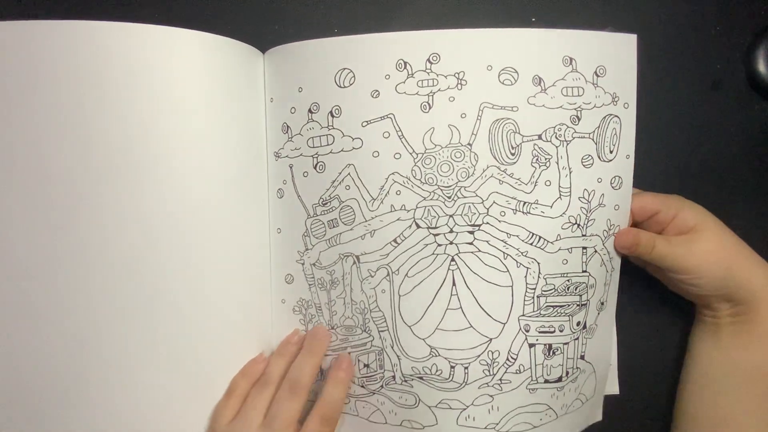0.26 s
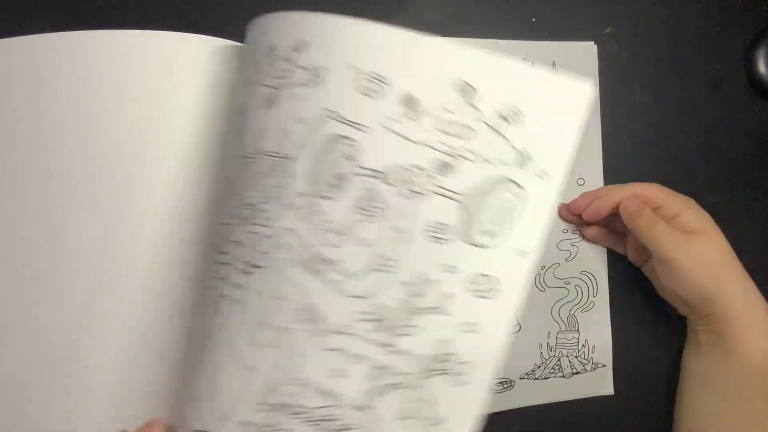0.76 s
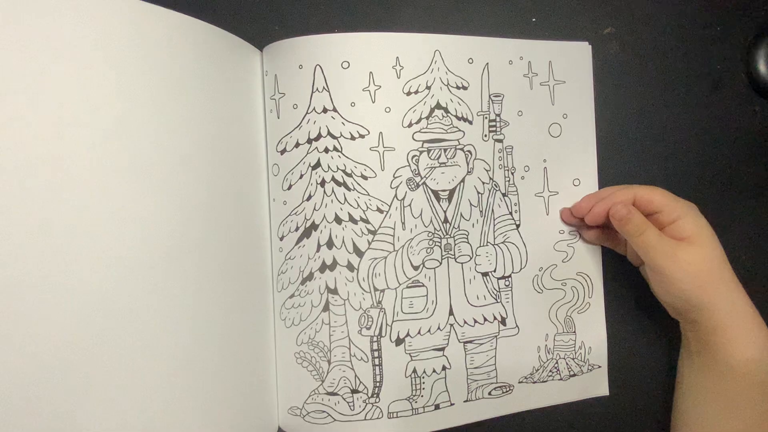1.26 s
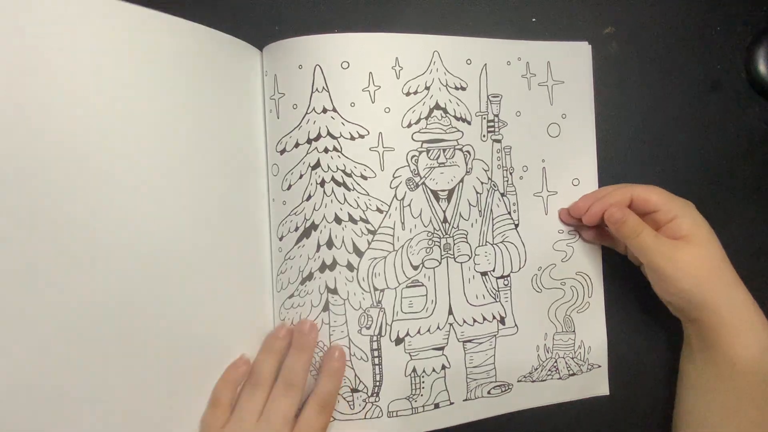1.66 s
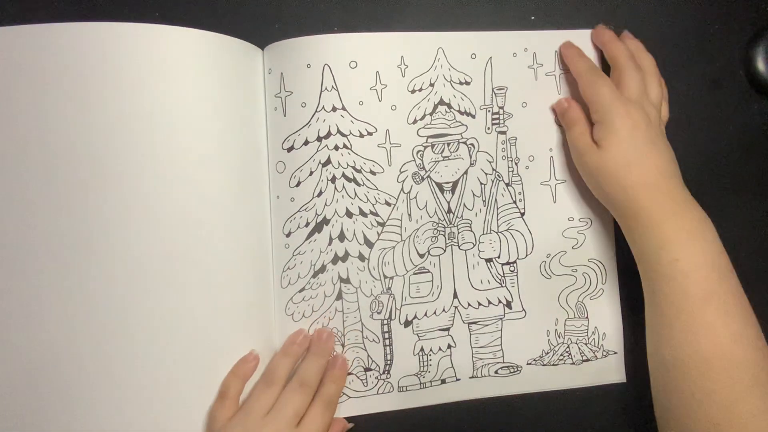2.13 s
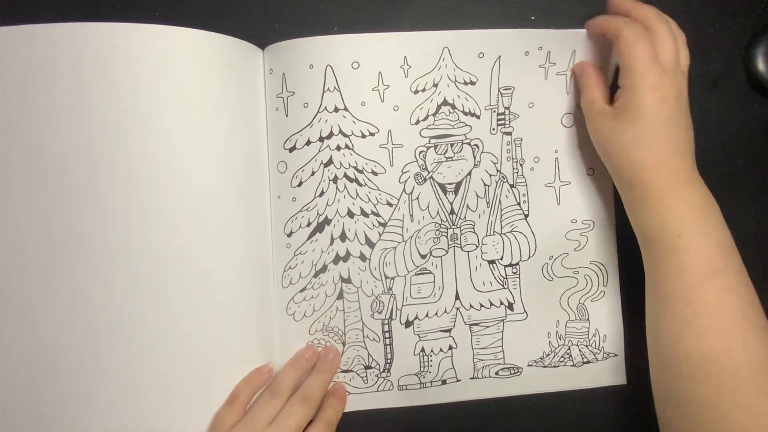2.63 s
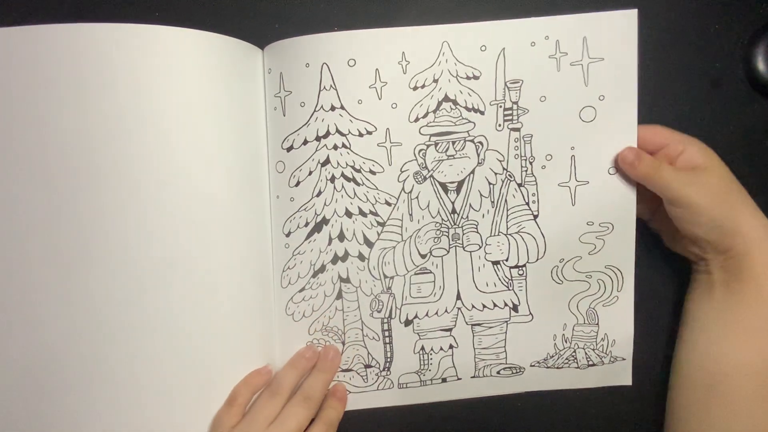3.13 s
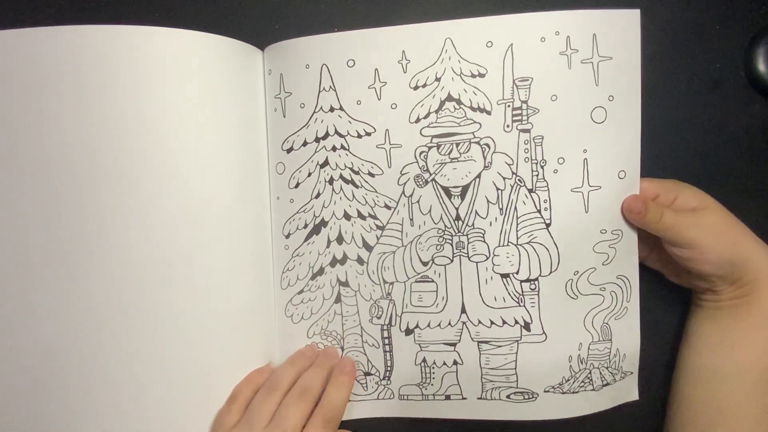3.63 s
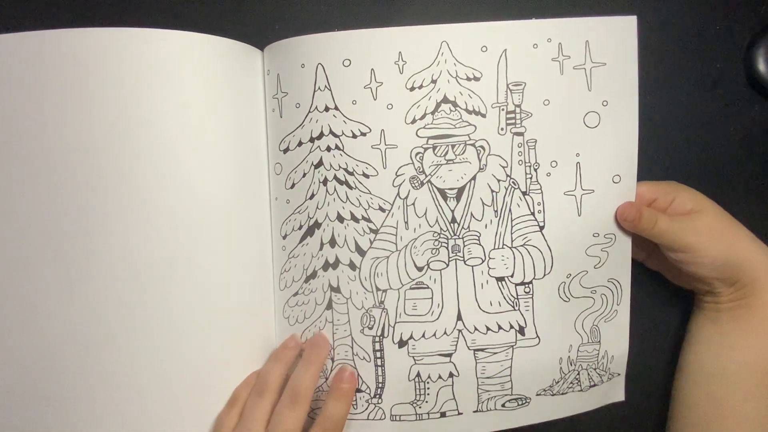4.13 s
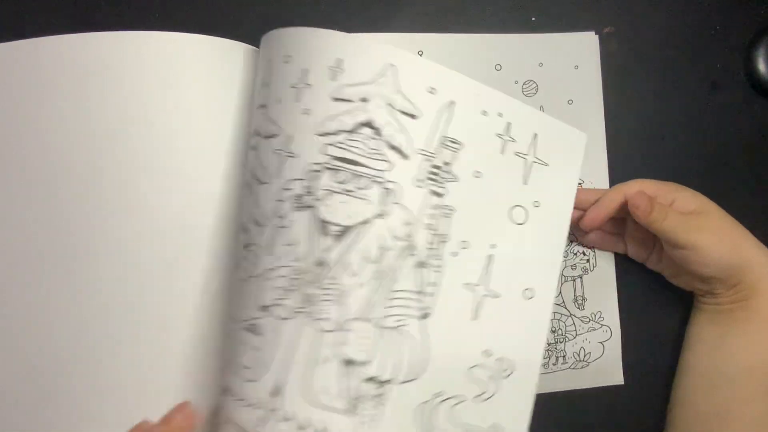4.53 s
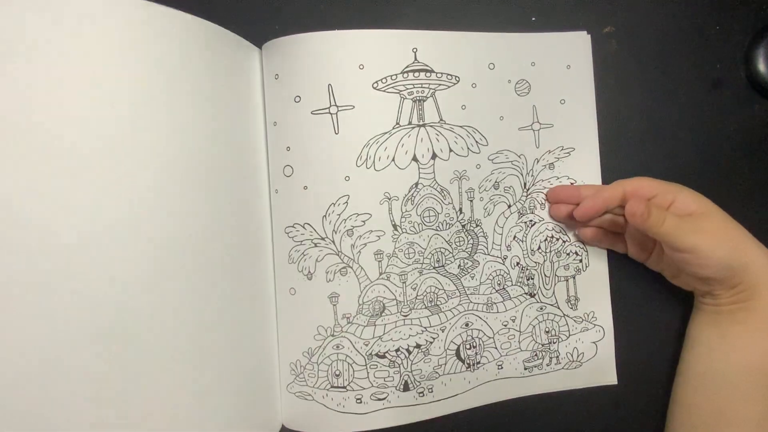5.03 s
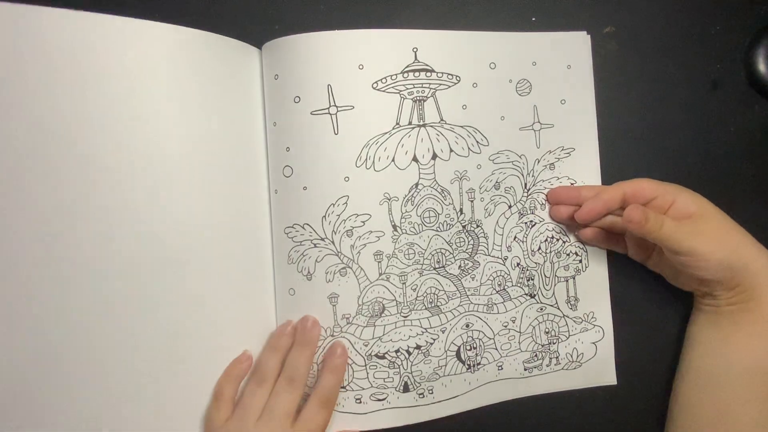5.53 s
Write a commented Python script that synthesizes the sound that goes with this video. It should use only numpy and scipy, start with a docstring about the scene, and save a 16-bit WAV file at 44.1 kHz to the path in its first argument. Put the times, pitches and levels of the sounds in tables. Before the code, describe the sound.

A steady low fan hum lies under close paper handling. First small crisp ticks as a page is lifted, then a broad dry swish and a buckling flop with a puff of air. Skin brushes and rubs the paper, with sharper scuffs midway and a quieter lull. Another page turns with a swish, lands with fuller hollow pops, and is lightly smoothed. Short, soft indoor reverberation.

```python
"""A fan drones throughout in a small, quiet room: coloured noise. A sheet of a large paper book is lifted with
small ticks, then swishes over its neighbour: dense random clicks, with an echo between sheet and book.
It buckles and flops down on a cushion of air: runs of pops ring the sheet over thuds and low puffs.
Hands smooth the page and feel along the edge for the next corner: duller, skin-coloured clicks.
Then a second page is ticked, swished and flopped over, and the last rubs and ticks follow."""
import sys
import numpy as np
from scipy import signal
from scipy.fft import rfft, irfft
from scipy.io import wavfile
from scipy.ndimage import uniform_filter1d

SR = 44100
rng = np.random.default_rng(int(sys.argv[2]) if len(sys.argv) > 2 else 0)


def put_to_file(sound):
    """Save the sound as 16-bit audio at rate SR, in the file named by the first command-line argument."""
    columns = np.atleast_2d(sound).T  # one column per channel
    safe = np.clip(columns, -1, 1)
    whole_steps = np.round(safe * 32767)
    wavfile.write(sys.argv[1], SR, whole_steps.astype(np.int16))


N = 255339
TIME = np.arange(N) / SR
HZ = np.maximum(np.fft.rfftfreq(N, 1 / SR), 1)


def from_db(db):
    """Decibels to gain."""
    return 10 ** (np.asarray(db) / 20)


def rms_one(x):
    """Scale to unit power."""
    return x / np.sqrt(np.mean(x ** 2) + 1e-20)


def over_hz(points):
    """Read a table of (frequency [Hz], value) at every frequency, on a logarithmic axis."""
    hz, value = np.transpose(points)
    return np.interp(np.log(HZ), np.log(hz), value)


def band(x, edge_hz, kind, order=2):
    """Causal Butterworth filter."""
    return signal.sosfilt(signal.butter(order, edge_hz, kind, fs=SR, output="sos"), x + 1e-18)


def resonate(x, hz, width_hz):
    """One two-pole resonance with a gain of about 1 on top."""
    r = np.exp(-np.pi * width_hz / SR)
    feed = np.array([1, 0, -1]) * (1 - r * r) / 2
    feedback = [1, -2 * r * np.cos(2 * np.pi * hz / SR), r * r]
    return signal.lfilter(feed, feedback, x + 1e-18)


def drift(rate):
    """Slow random wander around 0: straight lines between `rate` random points per second."""
    knots = rng.standard_normal(4000)
    return np.interp(TIME * rate, np.arange(len(knots)), knots)


def delayed(x, lag_s):
    """Read one channel a little later; the lag may vary over time."""
    return np.interp(TIME - lag_s, TIME, x)


def evened(x, span_s):
    """Steady the power of a noise over a short span."""
    power = uniform_filter1d(np.mean(x ** 2, axis=0), max(int(span_s * SR), 2))
    return x / np.sqrt(power.clip(0) + 1e-9)


# Stereo likeness of the sides: (frequency [Hz], left-right correlation [-1 to 1])
STEREO_LIKENESS = [(60, .99), (150, .93), (300, .72), (700, .35), (2000, .35), (4500, .45), (8000, .75),
                   (15000, .82)]
# Stereo balance: (frequency [Hz], left over right [dB])
STEREO_BALANCE = [(60, -1), (300, -4), (700, 4.5), (1300, 3.5), (2400, 1.5), (4200, 0), (6000, -8),
                  (9000, -0.5), (15000, 0.5)]
# Phase between the two microphone ports: (frequency [Hz], left ahead of right [rad])
PORT_PHASE = [(400, 0), (800, 0.8), (1500, -0.04), (3100, -5), (4200, -6.5), (6200, -7.5), (8300, -6.5),
              (16000, -6.7)]


def spread(pair, colour_db):
    """Mix two unrelated signals into one coloured stereo sound of unit power."""
    mid, side = rfft(pair)
    alike = over_hz(STEREO_LIKENESS)
    signs = np.array([[1], [-1]])
    stereo = np.sqrt(1 + alike) * mid + np.sqrt(1 - alike) * side * signs
    stereo[0] *= np.exp(1j * over_hz(PORT_PHASE))
    gain_db = colour_db + signs * over_hz(STEREO_BALANCE) / 2
    return rms_one(irfft(stereo * from_db(gain_db), N))


# Narrow rings and hollows in the rustle: (frequency [Hz], width [Hz], boost or cut [dB])
RUSTLE_RINGS = [(2830, 1600, -1.5), (3440, 130, 0.5), (3825, 190, 2.5), (4240, 540, 3), (5170, 180, 2),
                (6030, 200, 2.5), (5940, 150, -3.5), (7220, 160, -2), (7540, 150, -1.5), (9300, 120, 5),
                (10100, 80, 0.5), (10080, 140, 5)]


def rustle_colour(points):
    """A broad colour with the narrow rings and hollows on top, in dB."""
    rings = sum(db / (1 + (2 * (HZ - hz) / width) ** 2) for hz, width, db in RUSTLE_RINGS)
    return over_hz(points) + rings


def grains(per_s, size_db):
    """Fibres catch and slip: two streams of random clicks of uneven size, at unit power."""
    sizes = from_db(size_db * np.minimum(rng.exponential(1, (2, N)), 5))
    slips = rng.random((2, N)) < per_s / SR
    return rms_one(sizes * rng.choice([-1, 1], (2, N)) * slips)


def registers(texture, scrape_top_hz):
    """Split a rustle into hiss, top treble, scrape and hollow rumple, each of unit power."""
    edges_hz = [(2640, 7390), (7620, .45 * SR), (1010, scrape_top_hz), (418, 810)]
    return [rms_one(band(texture, edge, "band", order=4)) for edge in edges_hz]


def shifting(texture, depth, count=14):
    """As the contact travels over the paper, resonances come and go."""
    for_hz = np.geomspace(1400, 13000, count)
    return texture + sum(depth * drift(11) * resonate(texture, hz, hz / 9) for hz in for_hz)


STROKE_DEPTH_DB, STROKE_CURVE = 21.5, 1.23   # level lost over one attack or release; roundness of the fade
TOP_FOLLOWS = 1.4   # the top treble swings this much more than the hiss


def friction(strokes, parts, trims_db):
    """Each stroke speeds up, holds and slows; the top treble sags more in dB than the other registers."""
    power = np.zeros((len(parts), N))
    for s, attack, hold, release, level, top, scrape in strokes:
        near = slice(max(int((s - 3 * attack) * SR), 0), int((s + hold + 3 * release) * SR))
        age = TIME[near] - s
        slowing = np.maximum(np.maximum(-age / attack, (age - hold) / release), 0)
        sag = STROKE_DEPTH_DB * slowing ** STROKE_CURVE
        hiss = level - sag
        treble = level + top - TOP_FOLLOWS * sag
        # scrape and rumple share one level
        power[:, near] += from_db([hiss, treble, hiss + scrape, hiss + scrape]) ** 2
    return sum(part * np.sqrt(p) * from_db(trim) for part, p, trim in zip(parts, power, trims_db))


def blows(times, levels_db, rise_s, fade_s):
    """Envelope of blows that swell to a peak and die away exponentially; their powers add."""
    power = np.zeros(N)
    # a floor of 0.1 ms is added to every rise and fade
    events = np.broadcast_arrays(times, levels_db, np.abs(rise_s) + 1e-4, np.abs(fade_s) + 1e-4)
    for s, db, rise, fade in zip(*events):
        near = slice(max(int((s - 7 * rise) * SR), 0), int((s + 7 * fade) * SR))
        age = TIME[near] - s
        power[near] += (from_db(db) * np.exp(np.minimum(age / rise, -age / fade))) ** 2
    return np.sqrt(power)


# Resonances of the sheet lying on the book: (frequency [Hz], width [Hz], level [dB])
SHEET_MODES = [(318, 69, -5), (480, 112, -2.5), (615, 78, 2), (744, 96, -0.5), (957, 38, 4.5),
               (1185, 360, -10), (1390, 120, -2), (1865, 800, -17.5)]


def knocks(times, levels_db, damping=2.4):
    """One sharp contact each rings the sheet, which the finger damps at once by widening its modes."""
    click = signal.unit_impulse(SR // 20)
    ring = sum(from_db(db) * resonate(click, hz, damping * wide) for hz, wide, db in SHEET_MODES)
    ring = band(ring, [400, 1800], "band", order=4)
    contacts = np.zeros(N)
    contacts[(times * SR).astype(int)] = from_db(levels_db)
    return signal.fftconvolve(contacts, ring / np.abs(ring).max())[:N]


# Colour of the fan: (frequency [Hz], relative density [dB per Hz])
FAN_COLOUR = [(15, -20), (25, -24.5), (76, 3.5), (166, -8.5), (293, -14.5), (363, -17), (463, -23),
              (531, -16.5), (818, -12), (1040, -11), (1940, -20.5), (2480, -33.5), (5000, -50.5),
              (14800, -53.5), (16000, -64)]


def fan(level_db=-55.5):
    """A low drone with a soft rush of air above it: steady coloured noise."""
    return from_db(level_db) * spread(rng.standard_normal((2, N)), over_hz(FAN_COLOUR))


ROOM_T60_S = 0.38   # time to decay by 60 dB


def room(x, boom_hz=280, wall_hz=1000, treble_db=-11):
    """A diffuse tail: the boom is alike on both sides, and the furnishings soak up the treble."""
    age = TIME[:SR // 2]
    tail = rng.standard_normal((3, len(age))) * from_db(-60 * age / ROOM_T60_S) * (age > .006)
    tail /= np.sqrt(np.sum(tail ** 2, axis=1, keepdims=True))
    sides = tail[:2]
    boom = band(tail[2], boom_hz, "low")
    walls = 0.27 * band(sides, [boom_hz, wall_hz], "band", order=1)
    return signal.fftconvolve(x, boom + walls + from_db(treble_db) * sides, axes=1)[:, :N]


def nearby_echoes(x, count=5):
    """Hard things around the desk throw the treble back within a few milliseconds."""
    treble = band(x, 3100, "high")
    lags = (rng.uniform(.0015, .007, count) * SR).astype(int)
    return .1 * sum(np.pad(treble, ((0, 0), (lag, 0)))[:, :N] for lag in lags)


# Air squeezed from under a falling or pressed page:
# (time of peak [s], peak level [dB], pitch [Hz], time from peak to 1/e [s])
AIR_PUFFS = [(1.122, -47, 81.4, 0.017), (1.17, -29, 81.5, 0.0081), (1.649, -39, 69.6, 0.028),
             (4.992, -45, 78.5, 0.039)]


def air_cushion():
    """Escaping air makes soft, low puffs that swell and sink: tones under a bell-shaped envelope."""
    puffs = np.zeros(N)
    for s, db, hz, length in AIR_PUFFS:
        age = TIME - s
        puffs += from_db(db) * np.cos(2 * np.pi * hz * age) * np.exp(-(age / length) ** 2)
    return puffs


# Colour of skin on paper, also heard in the ticks: (frequency [Hz], relative density [dB per Hz])
SKIN_COLOUR = [(240, -28), (400, -5.5), (496, -30), (536, -16), (588, -18), (765, 0), (1310, -7),
               (1420, -6.5), (2400, -5.5), (3420, -4.5), (5350, -6.5), (6050, -4.5), (7170, -16),
               (9920, -19), (16000, -27)]
# A hand smooths the page or feels along its edge; levels are before the register trims:
# (time at full speed [s], attack [s], hold [s], release [s],
#  hiss level [dB], top treble re hiss [dB], scrape re hiss [dB])
HAND_RUBS = [(1.537, 0.012, .03, .06, -59, 4, 2), (1.59, 0.048, 0.017, 0.075, -55, 4, 3),
             (1.66, 0.029, 0.009, 0.071, -55.5, 1, 0), (1.78, 0.14, 0.015, 0.14, -60, 0.5, -3),
             (1.9, 0.15, .37, 0.15, -68.5, 5.5, -7), (1.985, 0.074, 0.019, 0.12, -64, 7.5, 2),
             (2.39, 0.3, 0.21, 0.081, -70, -6.5, 0.5), (2.67, 0.068, 0.011, 0.045, -53, -6.5, -16),
             (2.773, 0.025, 0.016, 0.06, -48.5, -9, -7), (2.86, 0.11, 0.06, 0.041, -46.5, -0.5, -15.5),
             (2.96, .05, 0.18, 0.053, -62, -0.5, -5), (3.22, 0.091, 0.16, 0.23, -60.5, 0, -6),
             (3.33, 0.057, 0.012, 0.032, -59, -4, 2), (3.56, 0.17, 0.17, .05, -74.5, -19, -2.5),
             (3.75, 0.053, 0.054, .15, -58.5, -1.5, -9.5), (5.15, 0.05, 0.11, .05, -83, -21, 0),
             (5.315, 0.023, 0.053, 0.091, -61, 2.5, -2.5), (5.44, 0.046, 0.05, 0.086, -61.5, -4, -1.5),
             (5.69, 0.17, 0.11, .1, -60, 1, -12.5)]


def rubbing_hands(judder_db=1.22, scrape_top_hz=2400):
    """Skin drags unevenly over the paper: dense slips whose level judders."""
    texture = spread(grains(per_s=11000, size_db=2.0), rustle_colour(SKIN_COLOUR))
    texture = shifting(texture, depth=.42)
    parts = registers(texture * from_db(judder_db * drift(110)), scrape_top_hz)
    return friction(HAND_RUBS, parts, trims_db=[1.0, -0.5, 4.0, -3.0])   # hiss, top, scrape, rumple


# Crisp ticks of page edges and fingertips; levels are before the layer trims:
# (time [s], snap level [dB], top treble re snap [dB], knock level [dB])
EDGE_TICKS = [(0.053, -53, -18, -49), (0.104, -43.5, -20, -49), (0.14, -46, -5, -48.5),
              (0.186, -46, -10, -41.5), (0.217, -41, -10, -48), (1.169, -41.5, -1.5, -46),
              (1.671, -48, -6, -34.5), (1.996, -37.5, -1, -41), (2.534, -54, -7, -46),
              (2.742, -37.5, -12, -59), (2.774, -32.5, -23, -49.5), (2.936, -43, -24, -45.5),
              (3.961, -48, -22, -49), (4.045, -59, -32, -50), (4.112, -49, -33, -46),
              (4.148, -44, -26, -42.5), (4.949, -37, -6, -39), (4.987, -40, -5.5, -47),
              (5.432, -49, -0.5, -55), (5.469, -41, -15, -52), (5.53, -58, -18, -54)]
TICK_RISE_S, TICK_FADE_S = 0.0021, 0.0053   # before the floor in blows()


def ticks(snap_db=-10.0, top_db=-6.5, crinkle_db=-0.5, knock_db=4.0):
    """An edge snaps free: a short knock in the sheet, a crinkle and a bright burst of slips."""
    s, level, bright, knock = np.transpose(EDGE_TICKS)
    slips = spread(grains(per_s=12000, size_db=0.5), rustle_colour(SKIN_COLOUR))
    hiss, top, scrape, rumple = registers(slips, scrape_top_hz=2160)
    crinkle = evened(rumple + scrape, span_s=0.0042)
    layers = [(hiss, level + snap_db), (top, level + bright + top_db), (crinkle, knock + crinkle_db)]
    bursts = sum(part * blows(s, db, TICK_RISE_S, TICK_FADE_S) for part, db in layers)
    return bursts + knocks(s, knock + knock_db)


# The sheet buckles, lands or is patted down; levels are before the layer trims, times before the floor:
# (time of peak [s], peak level [dB], thud re peak [dB], slap re peak [dB],
#  swell [s], fade [s], left over right [dB])
SHEET_FLOPS = [(0.2, -55, -6.5, 0, .04, 0.13, -4), (0.545, -38.5, -12, -16.5, 0.024, 0.04, -2),
               (1.19, -36.5, -1, -15, 0.0096, 0.013, 9), (1.232, -34.5, -9, -15, 0.0073, .022, 4),
               (1.255, -38.5, -7.5, -11, 0.013, 0.03, 6), (1.639, -38.5, 0.5, -15, 0.013, 0.04, 5),
               (1.672, -27.5, -9, -19, .002, .014, 7), (2.001, -42, -6.5, -10, 0.0051, 0.022, -4),
               (2.101, -47.5, -11, -7, 0.01, 0.018, -1), (2.935, -45.5, -5.5, -6.5, 0.0014, 0.011, -5),
               (3.762, -46.5, -34, -6.5, 0.024, 0.025, -2), (4.26, -47, -22, -17, 0.072, 0.031, -1),
               (4.798, -47, 8, -15, 0.0065, 0.024, 16), (4.952, -34, -5, -9.5, .001, 0.017, 9),
               (4.989, -33, -4, -13.5, 0.0076, 0.041, 7), (5.043, -30, -5.5, -1.5, 0.0045, 0.024, 8.5),
               (5.082, -32, -27, -21, 0.0059, 0.015, 5.5), (5.438, -46.5, -7.5, -1, 0.0047, 0.02, -1),
               (5.491, -48.5, 1, -17, 0.0016, 0.0096, 0)]
SETTLE_DB, SETTLE_S = -13.5, 0.1   # the book goes on shifting softly after each thud: re thud, fade


def flops(body_db=-5.5, thud_db=0.0, slap_db=-0.5, peak_knock_db=-11.0, right_lag_s=0.00018):
    """Each buckle is a quick run of soft pops that ring the sheet, a knock at its peak and a thud of the book."""
    s, level, thud, slap, swell, fade, pan = np.transpose(SHEET_FLOPS)
    pops = grains(per_s=2300, size_db=-0.5)
    # neighbouring modes ring in opposite polarity
    modes = [(-1) ** k * from_db(db) * resonate(pops, hz, wide)
             for k, (hz, wide, db) in enumerate(SHEET_MODES)]
    half = len(modes) // 2
    # a soft landing rings the lower modes, a flat slap the upper ones too
    body = evened(band(sum(modes[:half]), [260, 1000], "band", order=3), span_s=0.0029)
    edge = evened(band(sum(modes[half:]), [850, 2500], "band", order=4), span_s=0.008)
    sheet = body * blows(s, level + body_db, swell, fade)
    sheet = sheet + edge * blows(s, level + slap + slap_db, swell, fade)
    # the sheet lands on the left, so the right side hears it later and less directly
    right = delayed(sheet[0] + .5 * sheet[1], right_lag_s) / np.hypot(1, .5)
    heard = np.array([sheet[0], right])
    heard *= from_db(np.interp(TIME, s, pan) * np.array([[.5], [-.5]]))
    push = rng.standard_normal((1, N))
    boom = 1.13 * resonate(band(push, 440, "low"), 243, 60)
    book = evened(band(push, [75, 290], "band", order=3) + boom, span_s=0.0128)
    weight = level + thud + thud_db
    settling = blows(s, weight + SETTLE_DB, swell, SETTLE_S)
    thuds = np.hypot(blows(s, weight, swell, 0.82 * fade), settling)
    book_sides = book * thuds * from_db([[-.7], [.7]])   # leans slightly right
    return heard + knocks(s, level + peak_knock_db) + book_sides


# A page is turned: (time gripped [s], time pulled free [s], rising speed [m/s])
PAGE_TURNS = [(0.0, 0.417, 0.34), (4.09, 4.356, 0.25)]
REST_GAP_M = 0.1208   # bow of the gripped sheet over the book
FREEING_S = 0.12   # time from creeping to sliding


def sheet_motion():
    """Sliding freedom (0-1) and height over the book (m): gripped it creeps, freed it rises steadily."""
    free, gap_m = np.zeros(N), np.zeros(N)
    for gripped, pulled, speed in PAGE_TURNS:
        now = TIME >= gripped
        since_free = TIME[now] - pulled
        free[now] = np.clip(1 + since_free / FREEING_S, 0, 1)
        gap_m[now] = REST_GAP_M + speed * np.maximum(since_free, 0)
    return free, gap_m


# Colour of sheet on sheet: (frequency [Hz], relative density [dB per Hz])
SWISH_COLOUR = [(180, -29), (300, 11.5), (425, -6), (565, -9), (713, -3), (842, -12), (1060, -6),
                (1170, -3.5), (3640, -7.5), (6000, -5.5), (7690, -13), (8940, -12), (15000, -19),
                (16000, -23)]
# The sheet creeps, peels off its neighbour, sweeps over and skids down; levels are before the trims:
# (time at full speed [s], attack [s], hold [s], release [s],
#  hiss level [dB], top treble re hiss [dB], scrape re hiss [dB])
SHEET_SWEEPS = [(0.15, 0.091, .17, 0.22, -60.5, -7.5, 4.5), (0.545, 0.23, 0.033, 0.31, -47, -4.5, -8.5),
                (0.72, 0.17, 0.37, 0.13, -56.5, -3.5, -6.5), (1.0, 0.16, 0.053, 0.18, -61.5, 9, -5),
                (1.17, 0.092, .01, 0.11, -59.5, -1.5, -0.5), (4.25, 0.16, 0.14, 0.16, -58.5, -5, -2),
                (4.42, 0.19, 0.26, 0.21, -52, -5.5, -16), (4.56, 0.071, 0.034, .17, -48, -9.5, -3.5),
                (4.78, 0.19, 0.11, 0.12, -54, 1.5, -5.5), (4.96, 0.037, 0.03, .04, -61.5, -1.5, 4.5)]
CREEP_SLIPS_PER_S, SLIDE_SLIPS_PER_S = 1500, 13000


def turning_sheet(flutter_db=0.9, catch_db=2.0, scrape_top_hz=2800):
    """The swish bounces between the wobbling sheet and the book, so faint bands fall as the gap opens."""
    free, gap_m = sheet_motion()
    per_s = CREEP_SLIPS_PER_S + free * (SLIDE_SLIPS_PER_S - CREEP_SLIPS_PER_S)
    slips = grains(per_s, size_db=2.5) / np.sqrt(per_s)   # even power at any slip rate
    texture = spread(slips, rustle_colour(SWISH_COLOUR))
    lag_s = 2 * gap_m / 343   # there and back at the speed of sound, m/s
    dull = band(texture, 7500, "low", order=1)
    # the curved sheet throws a different, unsteady share to each side
    bounce = []
    for side in dull:
        share = .38 + .22 * drift(9)
        bounce.append(share * delayed(side, lag_s * (1 + .025 * drift(12))))
    texture = shifting(texture + free ** 2 * np.array(bounce), depth=.34)
    # while it creeps, the sheet catches and lets go
    unsteady_db = flutter_db * drift(70) + catch_db * (1 - free) * drift(90)
    parts = registers(texture * from_db(unsteady_db), scrape_top_hz)
    return friction(SHEET_SWEEPS, parts, trims_db=[0.65, 1.36, 3.36, -4.5])   # hiss, top, scrape, rumple


def scene(room_db=-11):
    """Paper and hands close by, the room and the fan behind them."""
    paper = air_cushion() + rubbing_hands() + ticks() + flops() + turning_sheet()
    return fan() + from_db(room_db) * room(paper) + nearby_echoes(paper) + paper


CUTOFF_HZ = 15900


def record(dry):
    """Cut the top steeply with an elliptic low-pass run both ways, so it adds no phase shift."""
    steep = signal.ellip(10, .05, 60, CUTOFF_HZ, fs=SR, output="sos")
    return signal.sosfiltfilt(steep, dry)


dry = scene()
out = record(dry)
put_to_file(out)
```